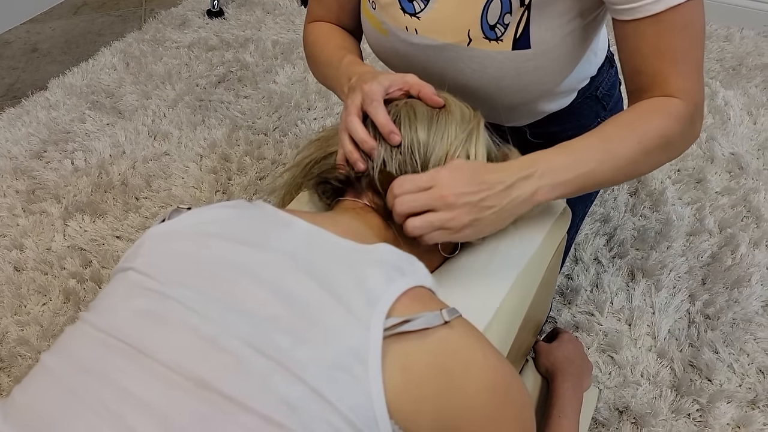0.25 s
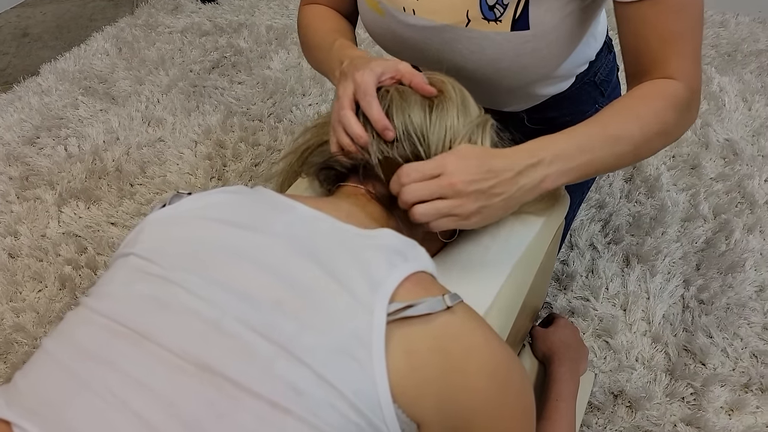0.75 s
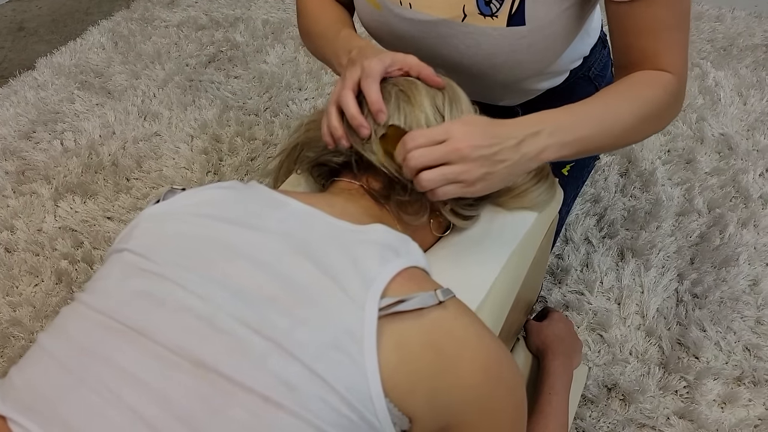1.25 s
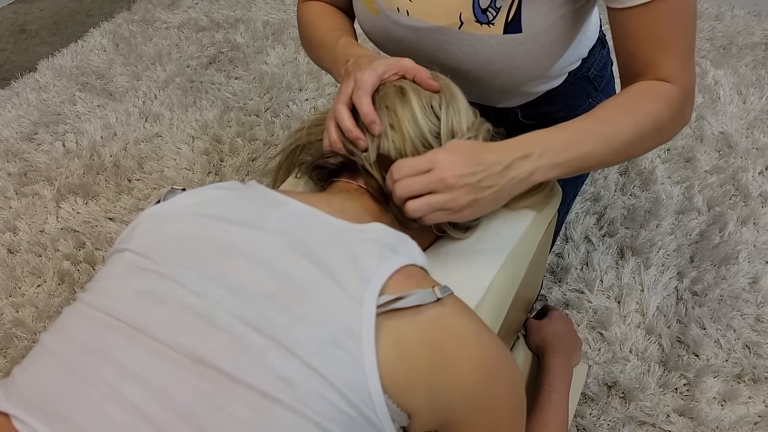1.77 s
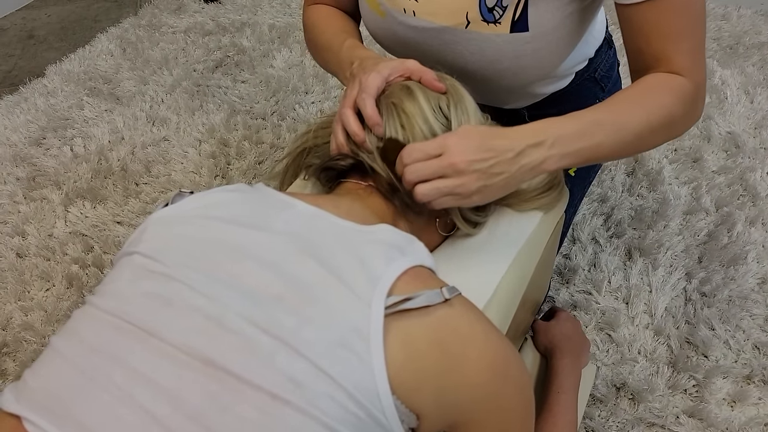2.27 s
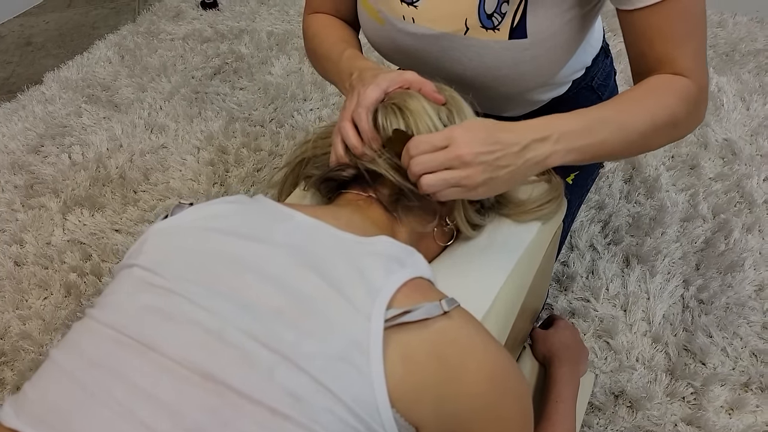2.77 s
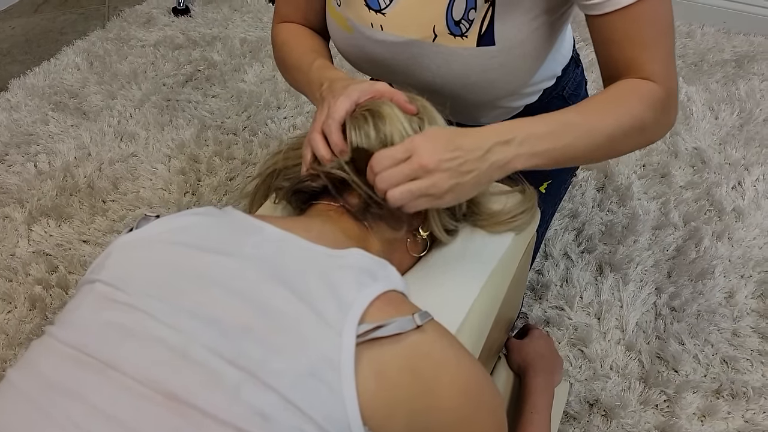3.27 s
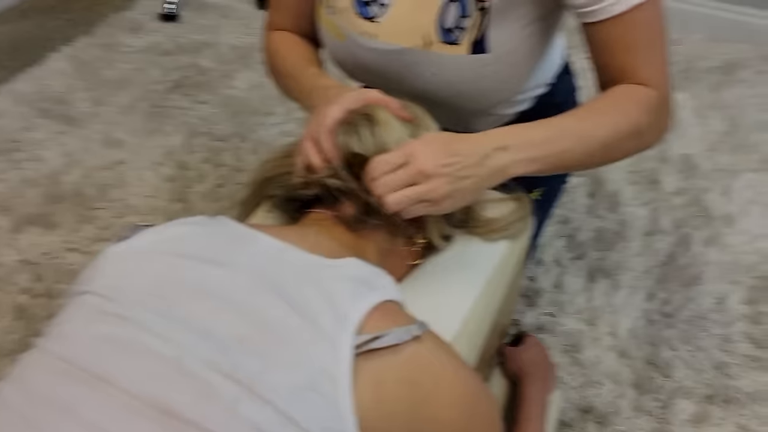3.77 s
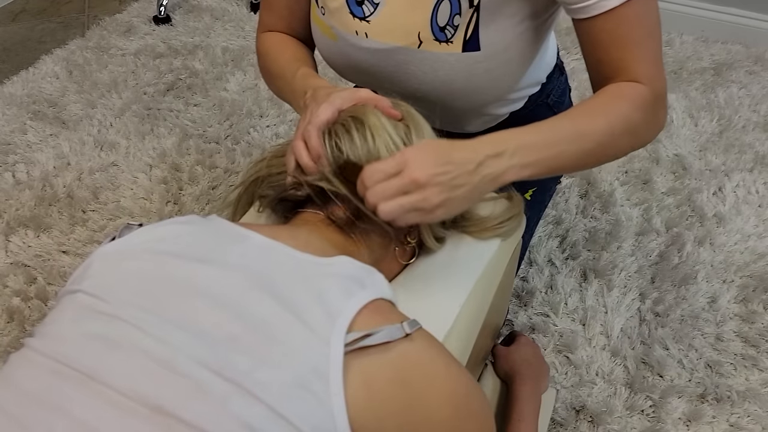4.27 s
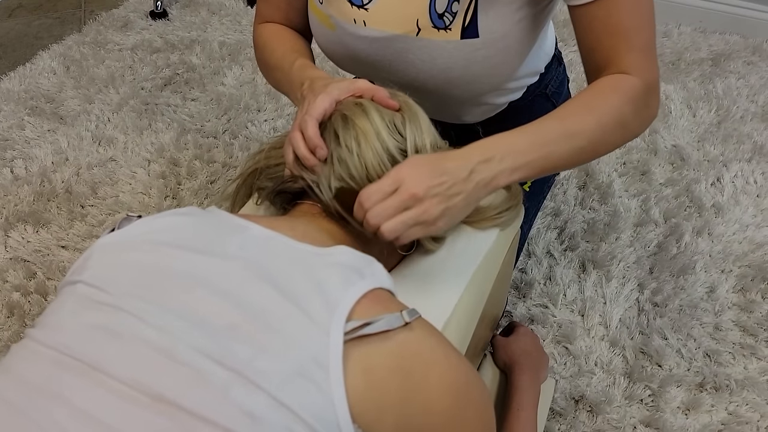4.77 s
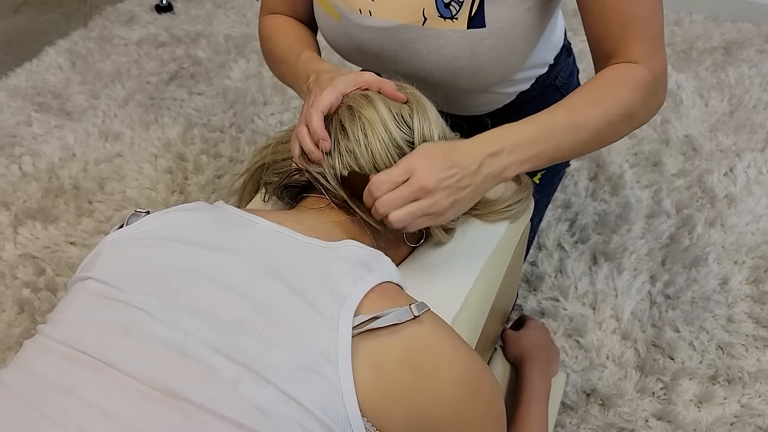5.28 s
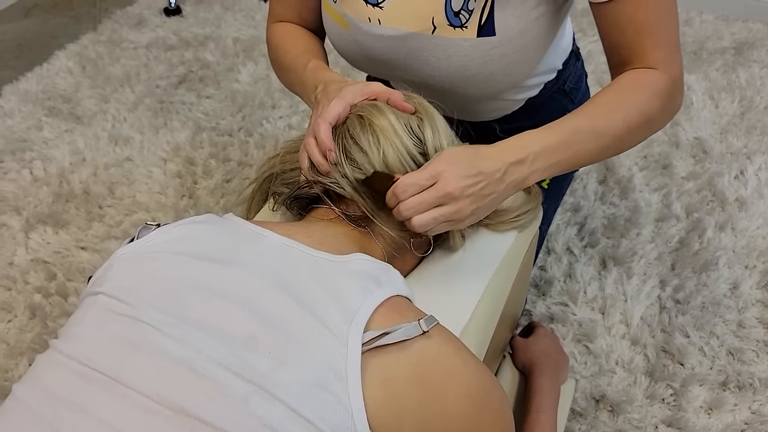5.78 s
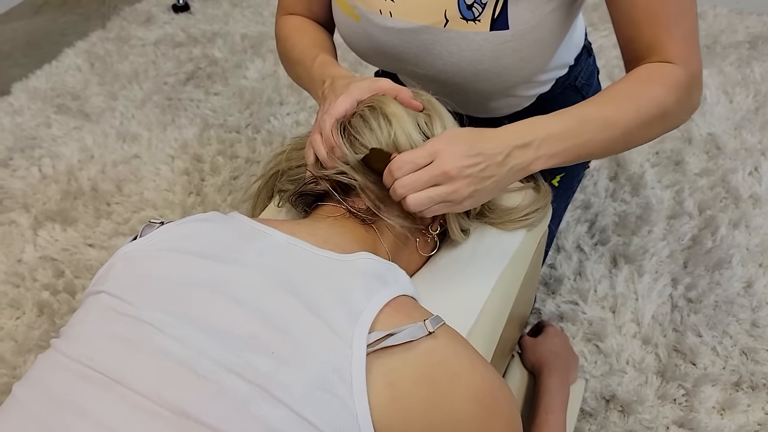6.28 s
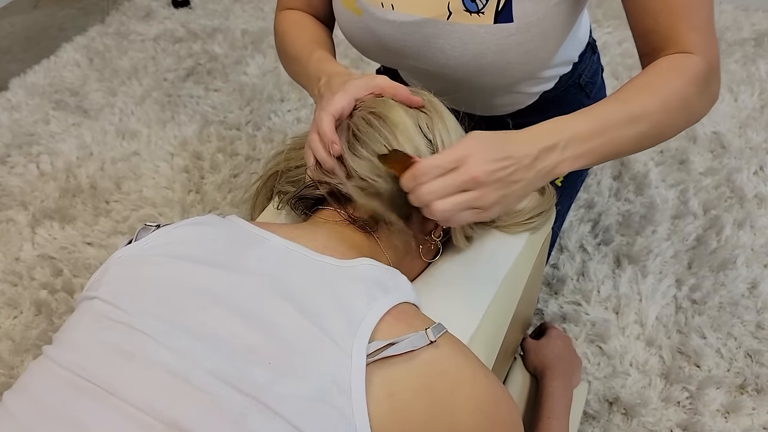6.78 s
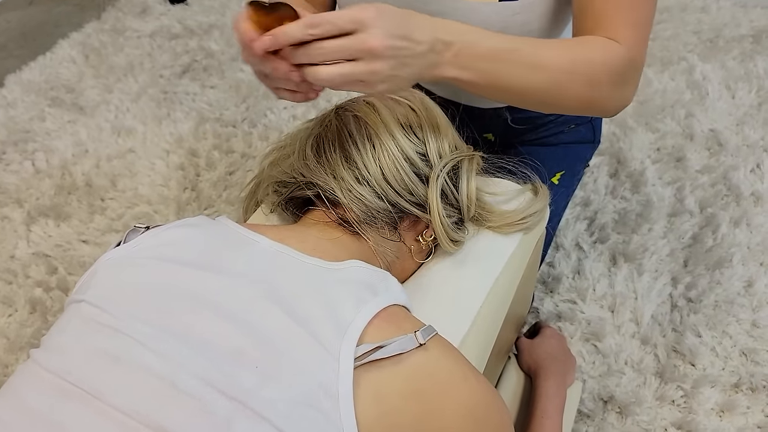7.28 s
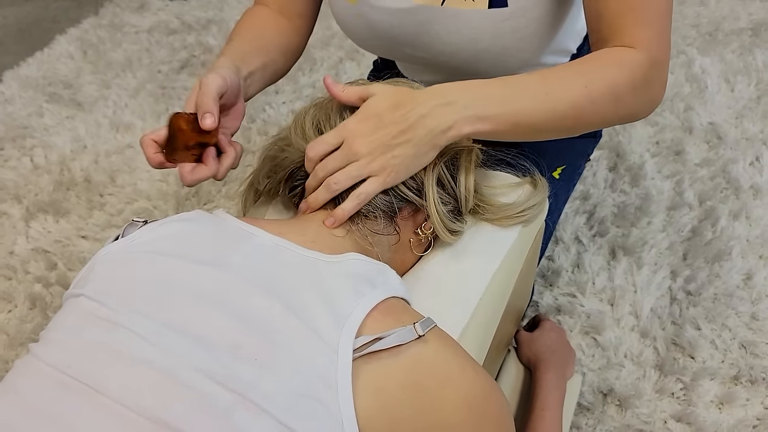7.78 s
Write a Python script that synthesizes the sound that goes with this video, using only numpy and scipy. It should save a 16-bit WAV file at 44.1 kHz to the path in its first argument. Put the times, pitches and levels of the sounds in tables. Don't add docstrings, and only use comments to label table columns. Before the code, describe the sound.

A low, steady ventilation rumble with faint smooth hiss runs throughout, in a small carpeted room with a very short echo. Close up and slightly right, a toothed comb scratches a scalp through long hair. Two quick dry swishes come at 0.2 and 0.6 s, then a near pause. From 1.2 to 2.7 s brisk strokes rustle, a strong one swelling to about 2.7, with tiny bright clicks around 1.9 to 2.3. Lighter rubbing follows from 2.9; fuller, pressed strokes land about every 0.4 s from 3.9 to 5.4, with a barely audible thin squeak near 4. At 5.55 to 5.75 s a tangle lets go in sharp, bright snaps, loudest at 5.57, followed by a scraping bite at 5.8. A stroke swells at 6.2, shorter scrapes run to 6.7, then only faint hair brushing remains until 8 s.

```python
import sys
import numpy as np
from scipy import signal
from scipy.fft import rfft, irfft, next_fast_len
from scipy.io import wavfile
from scipy.ndimage import uniform_filter1d, map_coordinates

SR = 44100
rng = np.random.default_rng(int(sys.argv[2]) if len(sys.argv) > 2 else 0)


def ratio(d):
    e = np.asarray(d, float) / 20
    return 10 ** e


def transcribe(u):
    v = np.clip(np.atleast_2d(u).T, -1, 1)
    q = np.round(v * 32767).astype(np.int16)
    wavfile.write(sys.argv[1], SR, q)


N = 354652


def unit(x):
    return x / np.sqrt(np.mean(x ** 2) + 1e-20)


def along(points, hz):
    point_hz, value = np.transpose(points)
    return np.interp(np.log(hz + 1), np.log(point_hz + 1), value)


def wobble(rate_hz):
    coarse = np.arange(0, N + 32, 32)
    knots = rng.standard_normal(int(N * 200 / SR) + 4)
    smooth = map_coordinates(knots, [coarse * min(rate_hz, 200) / SR])
    return np.interp(np.arange(N), coarse, smooth)


def filtered(x, response):
    size = next_fast_len(x.shape[-1] + 8192)
    spectrum = rfft(x, size) * response(np.fft.rfftfreq(size, 1 / SR))
    return irfft(spectrum, size)[..., :x.shape[-1]]


def ringing(x, modes):
    def response(hz):
        total = 0
        for k, (centre_hz, width_hz, level_db) in enumerate(modes):
            damping = 1j * hz * width_hz
            total = total + (-1) ** k * ratio(level_db) * damping / (centre_hz ** 2 - hz ** 2 + damping)
        return total
    return filtered(x, response)


def rush(gain, alike):
    def mid_side(hz):
        angle = np.arccos(np.clip(along(alike, hz), -1, 1)) / 2
        return gain(hz) * [np.cos(angle), np.sin(angle)]
    mid, side = filtered(rng.standard_normal((2, N)), mid_side)
    return unit(np.array([mid + side, mid - side]))


def slips(scatter_db, clump_db):
    size = ratio(scatter_db * np.minimum(rng.exponential(size=N), 6))
    clumps = ratio(clump_db * wobble(45) + clump_db * wobble(160))
    return unit(size * rng.standard_normal(N)) * clumps


def panned(x, pan_db):
    return x * ratio(np.array([[pan_db / 2], [-pan_db / 2]]))


# freq_hz [Hz], density_db [dB per Hz]
VENTILATION = [(4.1, -40), (7.0, 2), (25, 10), (38, -6.5), (59, -4), (93, -6), (124, -1), (155, -8),
               (209, -15.5), (230, -16), (267, -15.5), (386, -22.5), (631, -28.5), (749, -32.5),
               (2500, -41.5), (3250, -73), (5500, -120)]
# centre_hz [Hz], width_hz [Hz], lift_db [dB]
STANDING_WAVES = [(46.8, 21.4, 6), (77.4, 14, 5.5), (94, 11.5, 7), (120.3, 14.3, 6), (176.8, 17.6, 8),
                  (205.5, 11.3, 6.5), (252, 31, 2), (347, 5.2, 2.5)]
# freq_hz [Hz], density_db [dB per Hz]
FAR_TRAFFIC = [(150, -37), (280, -3), (450, -4), (700, -10), (1300, -19.5), (2500, -35)]
# freq_hz [Hz], likeness [0-1]
RUMBLE_ALIKE = [(10, .4), (25, .45), (70, .55), (130, .35), (290, .6), (640, .4), (1400, .33), (3000, .2)]
# freq_hz [Hz], density_db [dB per Hz]
PREAMP_HISS = [(590, -16), (1000, -8), (1320, -11.5), (1620, -14), (2570, -12.5), (3090, -11.5),
               (3760, -12.5), (4740, -13.5), (8930, -14), (15700, -15.5)]
# freq_hz [Hz], likeness [0-1]
PREAMP_ALIKE = [(1500, 0.071), (3100, 0.045), (7000, 0.03), (15000, 0.04)]
VENTILATION_DB, TRAFFIC_DB, HISS_DB = -44.5, -70, -67
CAR_S, CAR_WIDTH_S, CAR_DB = 5.9, 0.3, 7


def background():
    def lift_db(hz):
        return sum(db / (1 + (2 * (hz - c) / w) ** 2) for c, w, db in STANDING_WAVES)
    air = rush(lambda hz: ratio(along(VENTILATION, hz) + lift_db(hz)), RUMBLE_ALIKE)
    traffic = rush(lambda hz: ratio(along(FAR_TRAFFIC, hz)), RUMBLE_ALIKE)
    hiss = rush(lambda hz: ratio(along(PREAMP_HISS, hz)), PREAMP_ALIKE)
    car_db = CAR_DB / (1 + ((np.arange(N) / SR - CAR_S) / CAR_WIDTH_S) ** 2)
    traffic_db = TRAFFIC_DB + 0.6 * wobble(1.44) + car_db
    rumble = ratio(VENTILATION_DB + 1.1 * wobble(1.65)) * air + ratio(traffic_db) * traffic
    return panned(rumble, -0.34) + ratio(HISS_DB) * hiss


# freq_hz [Hz], t60_s [s]
ROOM_DECAY = [(1000, 0.29), (4000, 0.097), (8000, 0.11), (15000, 0.19)]


def room(x):
    hz, t, z = signal.stft(rng.standard_normal((2, SR // 3)), SR, nperseg=256)
    decay = ratio(-60 * t / along(ROOM_DECAY, hz)[:, None])
    tail = signal.istft(z * decay, SR, nperseg=256)[1]
    delayed = np.pad(x, (300, 0))[None]
    return signal.fftconvolve(delayed, tail / np.linalg.norm(tail[0]), axes=1)[:, :N]


SQUEAK_S, SQUEAK_LENGTH_S, SQUEAK_DB = 3.88, 0.62, -80.5
SQUEAK_HZ, SQUEAK_SAG_HZ = 5860, 30


def squeak():
    done = np.clip((np.arange(N) / SR - SQUEAK_S) / SQUEAK_LENGTH_S, 0, 1)
    pitch_hz = SQUEAK_HZ - SQUEAK_SAG_HZ * done + 22 * wobble(60)
    phase = 2 * np.pi * np.cumsum(pitch_hz) / SR
    swell = np.sqrt(np.abs(np.sin(np.pi * done)))
    return swell * ratio(SQUEAK_DB + 3.5 * wobble(25)) * np.sin(phase)


# start_s [s], peak_db [dB]
SPRUNG_HAIRS = [(0.1284, -46), (0.2154, -45), (0.4074, -52), (1.2994, -43), (1.909, -39), (2.0453, -39),
                (2.0634, -51), (2.2538, -35), (3.1009, -41), (3.2874, -36), (3.2984, -53), (4.1514, -39),
                (4.751, -43.5), (5.0724, -56), (6.4035, -48), (7.3154, -57)]


def crackles():
    edges = np.zeros(N)
    start_s, peak_db = np.transpose(SPRUNG_HAIRS)
    edges[np.round((start_s + 0.001) * SR).astype(int)] = ratio(peak_db + 8)
    return panned(ringing(edges, [(7600, 2000, -2), (10800, 4000, 0)]), -1.2)


# middle_s [s], length_s [s], level_db [dB]
TIP_BITES = [
    (1.235, 0.092, -71),
    (2.26, .08, -71),
    (4.93, .13, -69),
    (5.38, 0.084, -65.5),
    (5.817, 0.087, -57.5),
    (6.653, 0.09, -64.5),
]
# pitch_hz [Hz], width_hz [Hz], level_db [dB]
TIP_NOTE = [(4080, 420, 0)]


def bites():
    t, gain = np.arange(N) / SR, np.zeros(N)
    for middle_s, length_s, level_db in TIP_BITES:
        on = abs(t - middle_s) < length_s / 2
        gain[on] = ratio(level_db) * np.cos(np.pi * (t[on] - middle_s) / length_s)
    note = unit(ringing(slips(scatter_db=2.5, clump_db=1.1), TIP_NOTE))
    return panned(gain * note, -2)


# start_s [s], peak_db [dB], knock_db [dB], knock_hz [Hz], t60_s [s]
TANGLE_SNAGS = [
    (5.5489, -30, -9, 3400, .0035),
    (5.5577, -48, -14, 3000, .004),
    (5.5744, -19, -11, 3000, .0045),
    (5.5779, -28, -9, 3000, .008),
    (5.5860, -41, -9, 3000, .015),
    (5.6508, -26, -9, 2900, .004),
    (5.6523, -31, -9, 2500, .012),
    (5.6900, -49, -12, 3000, .003),
    (5.7315, -44, -18, 3000, .009),
    (5.7381, -26.5, -13, 6400, .006),
]
# start_s [s], peak_db [dB], knock_hz [Hz], t60_s [s], pan_db [left-right dB]
SMALL_CATCHES = [(1.9094, -51, 4000, .003, -1), (3.5270, -43, 3300, .012, 3), (3.5280, -52, 1300, .015, 0),
                 (3.5503, -42.5, 3450, .011, 3), (3.7065, -49, 2300, .003, -1),
                 (4.5650, -48, 2200, .004, -1), (5.6545, -44, 3600, .035, -3),
                 (5.7381, -41, 2500, .005, -3), (6.4036, -49, 2400, .005, 0), (6.4365, -50, 2300, .008, 0),
                 (6.4965, -53, 2700, .004, 2)]
# centre_hz [Hz], width_hz [Hz], level_db [dB]
STRAND_SNAP = [(6830, 620, 2.5), (7580, 1150, -0.5), (9000, 700, -2.5), (11400, 1200, -15),
               (14700, 1200, -15)]
# centre_hz [Hz], width_hz [Hz], level_db [dB]
COMB_KNOCK = [(2200, 360, 0.5), (3280, 690, -0.5), (3970, 1030, 1.5), (5020, 560, -4.5)]
SNAG_PAN_DB, CATCH_KNOCK_DB = -3.5, -0.4
SNAG_FOCUS, CATCH_FOCUS = 0.55, 0.22


def snags():
    out, t = np.zeros((2, N + SR)), np.arange(SR // 20) / SR
    catches = [(*row, SNAG_PAN_DB, SNAG_FOCUS) for row in TANGLE_SNAGS]
    catches += [(s, db, CATCH_KNOCK_DB, *rest, CATCH_FOCUS) for s, db, *rest in SMALL_CATCHES]
    for start_s, peak_db, knock_db, knock_hz, t60_s, pan_db, focus in catches:
        envelope = ratio(-60 * t / max(t60_s, 0.001)) * (1 - np.exp(-t / 0.00005))
        burst = envelope * rng.standard_normal((2, len(t)))
        burst[:, 4] += 5
        bright = ringing(ringing(burst[0], STRAND_SNAP), [(8300, 15000, 0)])
        knock = ringing(ringing(burst[1], COMB_KNOCK), [(knock_hz, focus * knock_hz, 0)])
        share = ratio(min(knock_db, 0))
        snap = np.sqrt(1.03 - share ** 2) * bright / np.abs(bright).max()
        snap = snap + share * knock / np.abs(knock).max()
        out[:, round(start_s * SR):][:, :len(t)] += ratio(peak_db) * panned(snap, pan_db)
    return out[:, :N]


# middle_s [s], length_s [s], swish_db [dB],
# press_db [dB], sheen_db [dB]
WRIST_FLICKS = [(0.175, 0.25, -59, 0.7, 0), (0.57, 0.19, -58, -0.5, -1), (1.227, 0.27, -66, -2, 0.1),
                (1.431, 0.16, -56, 0.1, -2), (1.715, 0.13, -66.5, -1.5, -2), (2.028, 0.19, -61.5, 0.3, -3),
                (2.255, 0.1, -60, -1.5, 0.7), (2.429, 0.213, -61, -3.5, -4), (2.919, 0.1, -67.5, -2.1, -3),
                (3.409, 0.11, -65.5, 0, 0), (3.972, 0.23, -66.5, -2.5, -9), (4.136, 0.23, -65.5, 4.5, 4.5),
                (5.134, 0.078, -65.5, -6, -6), (5.544, 0.24, -66.5, 2, -3), (5.623, 0.19, -68, -3, -9),
                (5.713, 0.35, -66, 0, -6), (5.801, 0.25, -61.5, 3, -1.1),
                (0.345, 0.14, -67, -2, 2.5), (0.405, 0.14, -72, 3, 7), (0.695, 0.2, -77, -0.4, 0.1),
                 (2.77, 0.08, -76, -5, 0.1), (2.85, 0.15, -74.5, 4, -3), (3.17, 0.13, -64.5, 1, 3),
                 (3.615, 0.17, -61, -7, -6), (3.865, 0.07, -68, -7, -2), (3.02, 0.38, -71, 0.1, -5),
                 (3.36, 0.12, -71, 4, -1), (4.279, 0.3, -69.5, 1.1, -5), (4.66, 0.21, -75, 5.5, 0),
                 (4.725, 0.082, -70, -1, -1), (5.08, 0.22, -76.5, 5, 0), (5.94, 0.32, -72, 3.5, 1),
                 (6.04, 0.22, -72.5, 0.1, -4), (6.33, 0.47, -76.5, 1, -4), (6.543, 0.35, -68.5, -1, -6),
                 (7.21, 0.34, -76, -0.5, -1), (7.313, 0.11, -76, -3, 6), (7.43, 0.2, -77, -8, 1.1),
                 (7.505, 0.08, -74, -12, -9), (7.9, 0.3, -74, -5, 3)]
# start_s [s], length_s [s], end_swish_db [dB], climb_db [dB], press_db [dB]
LONG_PULLS = [(1.413, 0.26, -59, 34, -0.5), (1.775, 0.17, -60.5, 5, 0), (2.124, 0.15, -66.5, 1.8, -3),
              (2.472, 0.29, -52.5, 33, -0.5), (3.07, 0.27, -67.5, -8.5, 3), (3.42, 0.352, -63.5, 3, 3),
              (3.71, 0.19, -58, 20, 1.5), (3.966, 0.18, -52, 17, 0.3), (4.316, 0.31, -57.5, 10, 0.1),
              (4.734, 0.28, -54, 16, 0.6), (5.143, 0.31, -56, 16.5, 0.2), (6.02, 0.28, -55.5, 21, 1.2),
              (6.536, 0.2, -67, -9.5, 7), (7.712, 0.8, -64.5, 7, -2)]
# start_s [s], length_s [s], end_swish_db [dB], climb_db [dB], press_db [dB]
SUDDEN_JERKS = [
    (4.79, 0.07, -66, -6, -3),
    (5.205, 0.11, -69.5, -6, -6),
    (6.394, 0.09, -63.5, -3.2, 3.5),
]
REST_LEVELS_DB = [-86, -83, -87.5, -86]
FLICK_LAYERS_DB = [1.5, -6, -3.5, 0.8]
PULL_LAYERS_DB = [0.083, -1.75, -1.7, 1]
PULL_START_LACK_DB = [0.0, 14, 10, 11]
PRESSURE_GAIN = [0.0, 0.93, 0.72]
PULL_SHEEN_GAIN = 0.94
PULL_GRIP_S, PULL_LET_GO_S = 0.095, 0.089
JERK_GRIP_S, JERK_LET_GO_S = 0.012, 0.03


def efforts():
    def rise(x):
        return np.sin(np.pi / 2 * np.clip(x, 0, 1)) ** 2

    def column(values):
        return np.array(values)[:, None]

    t = np.arange(N) / SR
    power = ratio(column(REST_LEVELS_DB)) ** 2 * np.ones(N)
    for middle_s, length_s, swish_db, press_db, sheen_db in WRIST_FLICKS:
        on = slice(*np.searchsorted(t, [middle_s - length_s / 2, middle_s + length_s / 2]))
        bell = np.abs(np.cos(np.pi * (t[on] - middle_s) / length_s)) ** 4.2
        pressed_db = column([*np.multiply(PRESSURE_GAIN, press_db), sheen_db])
        power[:, on] += (bell * ratio(swish_db + column(FLICK_LAYERS_DB) + pressed_db)) ** 2
    pulls = [(*row, PULL_GRIP_S, PULL_LET_GO_S) for row in LONG_PULLS]
    pulls += [(*row, JERK_GRIP_S, JERK_LET_GO_S) for row in SUDDEN_JERKS]
    for start_s, length_s, swish_db, climb_db, press_db, grip_s, let_go_s in pulls:
        on = slice(*np.searchsorted(t, [start_s, start_s + length_s]))
        since_s = t[on] - start_s
        edges = rise(since_s / grip_s) * rise((length_s - since_s) / let_go_s)
        lack_db = (climb_db + column(PULL_START_LACK_DB)) * (1 - since_s / length_s)
        pressed_db = column([*PRESSURE_GAIN, PULL_SHEEN_GAIN]) * press_db
        level_db = swish_db - lack_db + column(PULL_LAYERS_DB) + pressed_db
        power[:, on] += (edges * ratio(level_db)) ** 2
    return np.sqrt(power)


def patchy(x, patchy_db):
    z = signal.stft(x, nperseg=256)[2]
    field = uniform_filter1d(rng.standard_normal(z.shape[1:]), size=5, axis=0)
    field = uniform_filter1d(field, size=14, axis=1)
    return signal.istft(z * ratio(patchy_db * unit(field)), nperseg=256)[1][:, :N]


# centre_hz [Hz], width_hz [Hz], level_db [dB]
STRAND_SLIP = [(7220, 610, -1), (8120, 490, 2), (8920, 1800, -3.5)]
# centre_hz [Hz], width_hz [Hz], level_db [dB]
SKIN_SCRAPE = [(1160, 430, -5.5), (1864, 420, 2), (2480, 1350, -5)]
# centre_hz [Hz], width_hz [Hz], level_db [dB]
TEETH_RING = [(2930, 1800, -17), (4050, 310, -0.5), (4600, 800, -4.5), (5300, 1180, -5.5)]
# centre_hz [Hz], width_hz [Hz], level_db [dB]
FIBRE_SHEEN = [(10160, 930, -6.5), (13300, 4500, -8), (14600, 1150, -3.5)]


def strokes():
    shared = slips(scatter_db=3, clump_db=1.1)
    # modes, pan_db, spread
    layers = [(STRAND_SLIP, -1.6, 0.25), (SKIN_SCRAPE, -2.4, 0.3),
              (TEETH_RING, -2, 0.2), (FIBRE_SHEEN, -0.8, 0.6)]
    out = np.zeros((2, N))
    for gain, (modes, pan_db, spread) in zip(efforts(), layers):
        own = slips(scatter_db=3.5, clump_db=2.0)
        grains = 0.82 * shared + 0.59 * own
        near, far = ringing(np.array([grains, rng.standard_normal(N)]), modes)
        wide = spread * np.array([[1], [-1]]) * unit(far)
        out += gain * panned(unit(near) + wide, pan_db)
    muffled = filtered(out, lambda hz: 1 / (1 + (hz / 16000) ** 8))
    return patchy(muffled, patchy_db=1.3)


# freq_hz [Hz], lead_rad [radians]
LEFT_LEAD = [(5000, 0.0), (9500, -0.25), (12000, -0.6), (15800, -2.1)]


def ports(x):
    return filtered(x, lambda hz: np.exp(0.5j * along(LEFT_LEAD, hz) * [[1], [-1]]))


def scene():
    rubbing = strokes()
    snaps = snags() + crackles()
    answer = room(ratio(-15.5) * rubbing.mean(0) + ratio(-11) * snaps.mean(0))
    return background() + answer + squeak() + bites() + ports(rubbing + snaps)


def low_pass(x):
    return signal.sosfilt(signal.butter(12, 16660, fs=SR, output="sos"), x)


def record(dry):
    limited = filtered(dry, lambda hz: np.where(hz < 15790, 1, ratio(-44)))
    return low_pass(limited)


dry = scene()
out = record(dry)
transcribe(out)
```